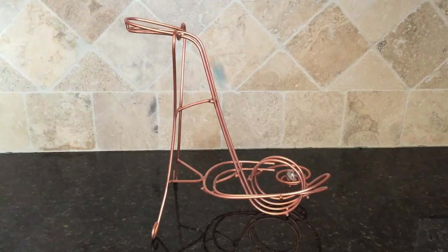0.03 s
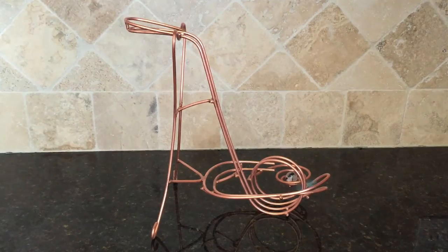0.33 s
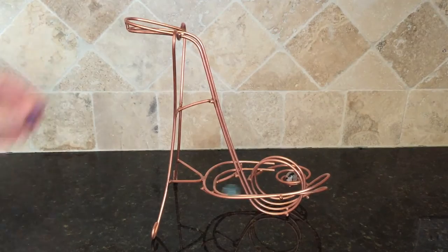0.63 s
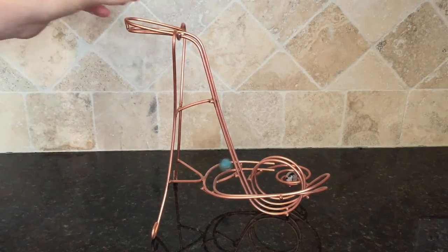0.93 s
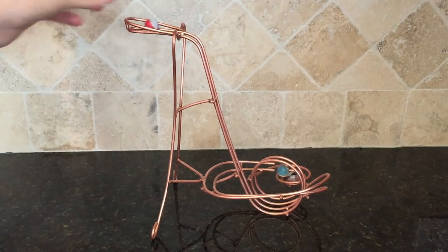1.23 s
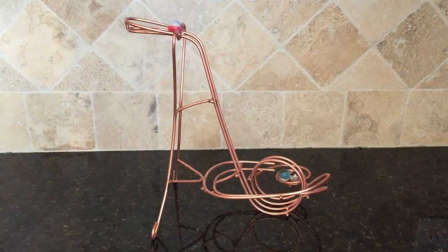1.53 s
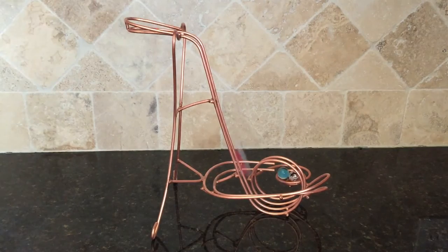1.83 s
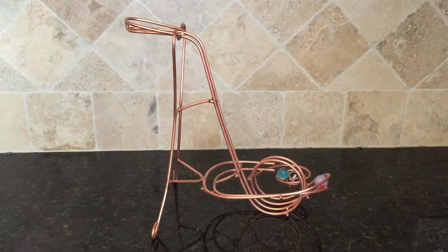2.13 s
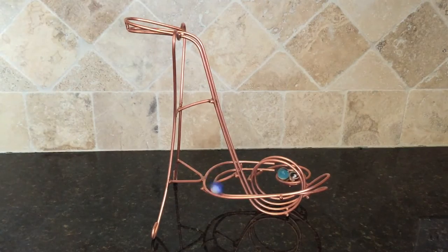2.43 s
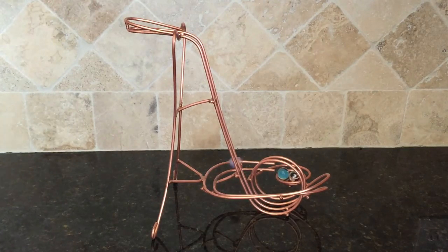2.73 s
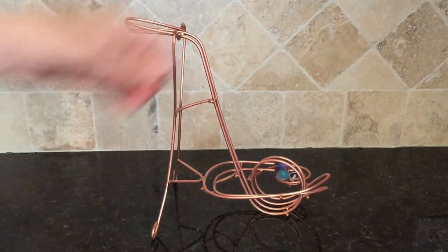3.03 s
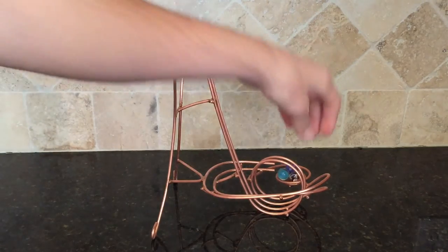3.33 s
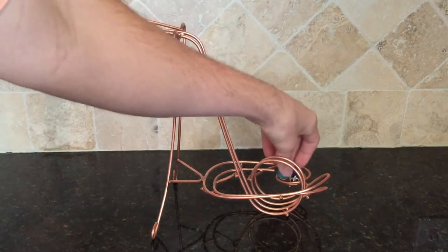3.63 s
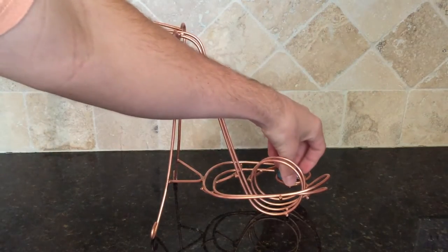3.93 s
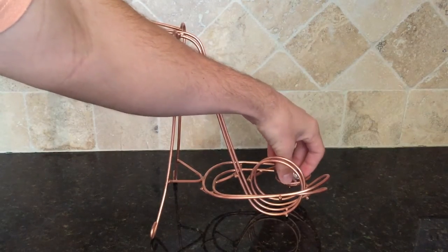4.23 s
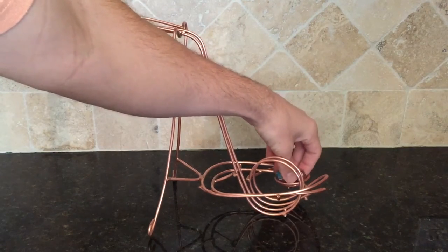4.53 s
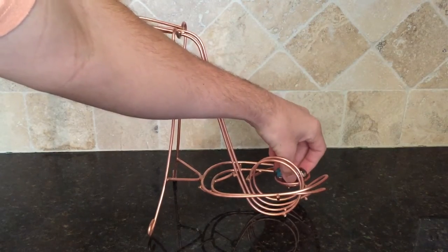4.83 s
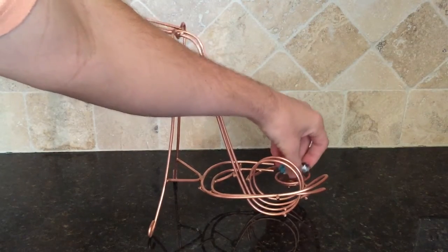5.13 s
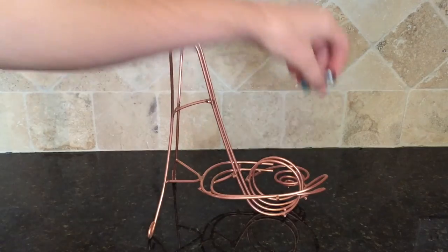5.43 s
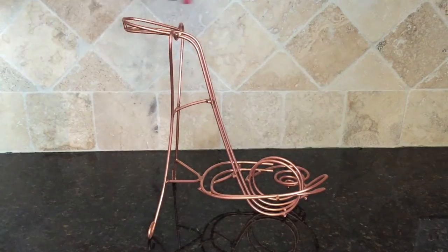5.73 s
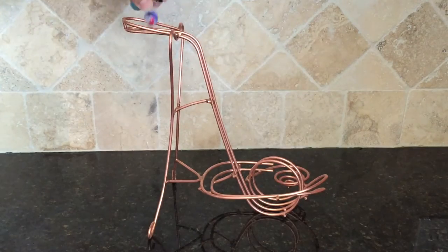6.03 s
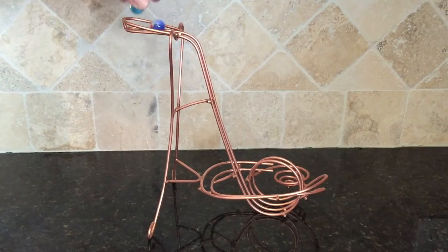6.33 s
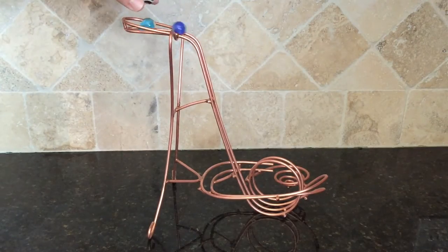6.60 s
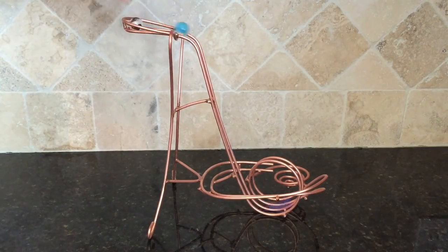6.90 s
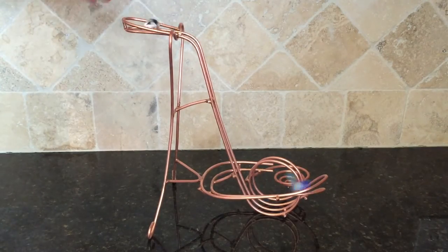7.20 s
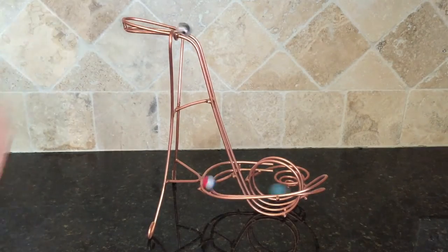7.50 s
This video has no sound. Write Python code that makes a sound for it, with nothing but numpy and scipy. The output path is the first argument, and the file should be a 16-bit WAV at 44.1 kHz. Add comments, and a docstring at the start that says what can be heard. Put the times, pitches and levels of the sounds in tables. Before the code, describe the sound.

Heard up close in a quiet kitchen, two glass marbles run one after the other down a wire track, each with bright clicks and a metallic rattle that surges and trails away. Glass clacks on glass, then it goes nearly silent apart from a few muted ticks. The wire frame knocks back onto the counter, several crisp ringing clicks follow, and two more marbles rattle down in quick succession over a faint hum.

```python
"""Glass marbles run down a copper wire track on a stone counter in a kitchen.
First two marbles, one after the other, knock onto the rails and rattle round the loop, exciting
the modes of the wire frame. From 3 s glass clacks on glass. A hand then holds the frame and damps
it, until at 5.2 s it drops back on its feet. More knocks follow, and near 7 s two more marbles run
down close together. A short room echo follows the marbles; air noise and a hum lie underneath."""
import sys
import numpy as np
from scipy import signal
from scipy.fft import rfft, irfft
from scipy.io import wavfile
from scipy.ndimage import uniform_filter1d

SR = 44100
rng = np.random.default_rng(int(sys.argv[2]) if len(sys.argv) > 2 else 0)


def put_to_file(sound):
    """Save the sound as 16-bit audio at rate SR, in the file named by the first command-line argument."""
    columns = np.atleast_2d(sound).T  # one column per channel
    safe = np.clip(columns, -1, 1)
    whole_steps = np.round(safe * 32767)
    wavfile.write(sys.argv[1], SR, whole_steps.astype(np.int16))


N = 337806
TIME = np.arange(N) / SR
SIZE = 2 ** 14  # samples in one short event
AGE = np.arange(SIZE) / SR
HZ = np.fft.rfftfreq(SIZE, 1 / SR) + 1
GRIP_START_S, GRIP_END_S, HELD_T60_S = 3.7, 5.2, 0.14  # fingers damp the wires


# glass striking wire: start_s, level_db, tilt_db_per_octave, relative_clang_db, ring_scale_s, pitch_hz
RAIL_KNOCKS = [(0.0, -48.5, -3.5, -8, 0.2, 13600), (0.0507, -46.5, -1, -12, 0.29, 5900),
               (0.153, -53.5, -8, -8.5, 0.16, 960), (0.181, -33, 6.5, -15.5, 0.12, 12100),
               (0.2339, -25.5, 4.5, -14.5, 0.12, 13400), (0.7104, -59, -4, -9, 0.083, 8470),
               (0.876, -49.5, -0.8, -25, 0.035, 9100), (1.1683, -25.5, 3.1, -12, 0.44, 2436),
               (1.211, -34, 1.3, -27, 0.2, 6840), (1.2978, -22.5, 6.5, -16.5, 0.36, 9550),
               (1.4906, -55.5, 0.5, -27, 0.078, 7200), (1.8966, -44, -1.5, -26, 0.15, 848),
               (1.9127, -40, 6, -11, 0.1, 882), (2.4783, -49, 0, -26, 0.88, 8900),
               (2.6132, -48, 1.5, -24, 0.051, 11600), (2.782, -59.5, -3, -9.5, 0.11, 800),
               (3.0293, -37, 2, -15.5, 0.37, 1283), (3.1194, -35, 0, -7, 0.56, 1294),
               (4.18, -51, 0.5, -15, 0.13, 9630), (4.205, -45, 1.7, -14.5, 0.029, 910),
               (5.2331, -36.5, 3, -7, 0.35, 8200), (5.271, -39.5, 11, -12, 0.25, 801),
               (6.1074, -33, 3, -16.5, 0.43, 1088), (6.127, -28.5, 12.5, -17, 0.095, 2503),
               (6.156, -26, 14, -14.5, 0.38, 8500), (6.4731, -25, 4, -13.5, 0.37, 6720),
               (6.8102, -40.5, 3.5, -10, 0.066, 11500), (6.8276, -23, 5, -15, 0.22, 13100),
               (6.906, -38, 4.5, -16, 0.6, 12200), (7.198, -35, 5.5, -10, 0.1, 7020),
               (7.241, -34, 1, -19, 0.068, 9130), (7.635, -49, -2, -16, 0.1, 8470)]
# share of a blow that swings the whole frame: frequency_hz, gain_db
CLANG_SPECTRUM = [(30, -32.5), (100, 12.5), (200, 6), (600, -5.5), (1000, 4), (1500, -4.5), (2500, 1.5),
                  (3500, -10), (7000, -8), (15000, -17.5)]

def knocks(modes, ring_share=0.45, clang_boost_db=1, free_t60_s=0.33):
    """Impact excitation: a blow disperses along the wires as a dense ring and sets low modes clanging."""
    out = np.zeros(N)
    for start_s, level_db, slope, clang_db, ring_scale_s, _ in RAIL_KNOCKS:
        frame = frame_response(modes)
        ring = colour(noise_burst(ring_scale_s * ring_share), frame * tilt(slope))
        ring = at_level(kitchen_echo(ring, wet_db=0), level_db, 0.024)
        t60_s = HELD_T60_S if GRIP_START_S < start_s < GRIP_END_S else free_t60_s
        clang = colour(noise_burst(t60_s), frame ** 1.07 * amp(curve(CLANG_SPECTRUM, HZ)))
        add(out, start_s, ring + at_level(clang, level_db + clang_db + clang_boost_db, 0.036))
    return out


def pings(gain_db=-8.5, rise_s=0.0029, t60_at_1khz_s=0.27, twin_db=-5):
    """Beating: a mode struck at its antinode sings on against the slightly detuned twin rail."""
    out = np.zeros(N)
    for start_s, level_db, _, _, _, pitch_hz in RAIL_KNOCKS:
        free_t60_s = t60_at_1khz_s * (pitch_hz / 1000) ** -0.13  # higher modes die sooner
        t60_s = HELD_T60_S if GRIP_START_S < start_s < GRIP_END_S else free_t60_s
        twin_hz = pitch_hz + rng.uniform(22.5, 90)
        rails = np.sin(2 * np.pi * pitch_hz * AGE) + amp(twin_db) * np.sin(2 * np.pi * twin_hz * AGE)
        envelope = amp(level_db + gain_db - 60 * AGE / t60_s) * (1 - np.exp(-AGE / rise_s))
        add(out, start_s, np.sqrt(2) * envelope * rails)
    return out


# trips down the track, timed from the foot of the loop:
# start_s, loop_force_db, leaving_force_db, growl_db, duration_s
MARBLE_RUNS = [(0.262, -34.5, -51, 3.5, 0.92), (1.976, -31.5, -48, 0.5, 1.27),
               (6.997, -34.5, -50.5, 5, 1.0), (7.256, -33, -45.5, 4.5, 1.0)]

def rolling(modes, gain_db=-3, growl_hz=1200, wander_octaves=0.3, hop=2048):
    """Moving excitation: chatter rings the frame from spot after spot, brighter under greater force."""
    force_db = rolling_force_db()
    run_s, _, _, run_growl_db, _ = np.transpose(MARBLE_RUNS)
    drive = np.pad(chatter(force_db), (hop, SIZE))
    window = np.pad(np.hanning(2 * hop), (0, SIZE - 2 * hop))
    out = np.zeros(N + hop)
    for i in range(0, N, hop):
        slope = 0.17 * (np.clip(force_db[i], -66, -30) + 38.5)
        centre_hz = growl_hz * 2 ** (wander_octaves * rng.standard_normal())
        growl_db = np.interp(i / SR, run_s, run_growl_db) * bell(centre_hz, octaves=0.78)
        frame = frame_response(modes, strong_spread_db=2.5, floor_db=0, ripple_db=3)
        gain = unit_rms(frame * tilt(slope) * amp(growl_db))
        add(out, i / SR, colour(drive[i:i + SIZE] * window, gain))
    return amp(gain_db) * kitchen_echo(out[hop:], wet_db=1)


def rolling_force_db():
    """Centripetal force: a marble presses hardest at the foot of the loop and goes light over the top."""
    ramp_lead_s, ramp_db = 0.7, -77.5
    bend_lead_s, bend_width_s, bend_db = 0.225, 0.025, -63
    turn_s, top_dip_db = 0.14, 5.5
    entry_s, entry_db_per_s, exit_db_per_s = 0.075, 177, 142.5
    slowing_db_per_s, creep_db = 27, -62  # on the wide curve, then round the last spiral
    power = np.zeros(N)
    for start_s, loop_db, leaving_db, _, duration_s in MARBLE_RUNS:
        age = TIME - start_s
        before, after = np.maximum(-age, 0), np.maximum(age - turn_s, 0)
        ramp = amp(ramp_db) * gate(age + ramp_lead_s, ramp_lead_s - bend_lead_s)
        bend = amp(bend_db) * np.exp(-.5 * ((age + bend_lead_s) / bend_width_s) ** 2)
        height = np.sin(np.pi * np.clip(age / turn_s, 0, 1)) ** 2
        easing_db = top_dip_db * height + entry_db_per_s * before + exit_db_per_s * after
        loop = amp(loop_db - easing_db) * gate(age + entry_s, duration_s)
        coast = np.hypot(amp(leaving_db - slowing_db_per_s * after), amp(creep_db))
        power += ramp ** 2 + bend ** 2 + loop ** 2 + (coast * gate(age, duration_s)) ** 2
    return 10 * np.log10(power + 1e-14)


def chatter(force_db, slow_per_s=250, fast_per_s=2000, spread_db=4, grind_db=-10, smear_t60_s=0.034):
    """Surface roughness: tiny impacts on flaws in the rails, denser at speed, over a fine grinding."""
    per_s = np.interp(force_db, [-58, -34], [slow_per_s, fast_per_s])
    sizes = amp(spread_db * np.minimum(rng.exponential(1, N), 4)) * rng.choice([-1, 1], N)
    taps = sizes * (rng.random(N) < per_s / SR) / np.sqrt(per_s)
    # bending waves disperse, so each impact arrives as a short burst
    power = signal.lfilter([1], [1, -amp(-120 / (smear_t60_s * SR))], taps ** 2)
    bursts = unit_rms(np.sqrt(power) * rng.standard_normal(N))
    return unit_rms(bursts + amp(grind_db) * rng.standard_normal(N)) * amp(force_db)


# marble striking marble: start_s, level_db, tilt_db_per_octave
GLASS_CLACKS = [(3.029, -30.5, 3.5), (3.157, -27, 4), (3.3585, -42.5, 0.4), (3.7232, -58.5, -5.5),
                (4.3378, -47.5, -6.5), (4.636, -58, -2.5), (6.1554, -27, 15)]

def clacks(modes, contact_t60_s=0.0014, ring_db=-7, ring_t60_s=0.078, low_cut_hz=1800):
    """Hard contact: glass on glass gives a brief tick and a little ring from the supporting wires."""
    out = np.zeros(N)
    envelope = amp(-60 * AGE / contact_t60_s) + amp(ring_db - 60 * AGE / ring_t60_s)
    for start_s, level_db, slope in GLASS_CLACKS:
        tick = rng.standard_normal(SIZE) * envelope
        gain = frame_response(modes) ** 0.97 * tilt(slope) / (1 + (low_cut_hz / HZ) ** 3)
        clack = kitchen_echo(colour(tick, gain), wet_db=-13)
        add(out, start_s, at_level(clack, level_db, 0.017))
    return out


# strong modes of the wire frame: frequency_hz, bandwidth_hz, peak_db
FRAME_MODES = [(316.3, 17, 16.5), (464.6, 24, 2), (704, 11, 8), (798, 17, 8), (927.3, 36, 10.5),
               (1136, 11, 9.5), (1277, 46, 8), (1801, 16, 9), (2494, 22, 18), (2590, 9.1, -0.5),
               (3230, 21, -3), (3962, 78, 9), (4405, 31, 7.5), (5930, 120, 8.5), (6930, 40.6, 6),
               (6826, 26, 16.5), (8280, 120, 10.5), (8480, 18.5, 5.5), (8760, 8.1, 21), (9133, 130, 13),
               (9574, 33, 16), (11105, 65, 15), (12000, 64, 17), (11950, 49, 21), (12430, 40, 18.5),
               (12970, 28, -6), (12830, 37, 18.5), (13200, 48, -8), (13700, 42, 1), (14230, 13.5, 5)]

def resonances(weak_count=260, weak_width_hz=22, weak_db=5.5):
    """Resonance: one power curve a row, for the strong modes and then many weak, irregular overtones."""
    weak_hz = np.linspace(1400, 16000, weak_count) + rng.uniform(-30, 30, weak_count)
    modes = list(FRAME_MODES) + [(hz, weak_width_hz, weak_db) for hz in weak_hz]
    centre_hz, width_hz, peak_db = np.transpose(modes)[:, :, None]
    return amp(peak_db) ** 2 / (1 + (2 * (HZ - centre_hz) / width_hz) ** 2)


# broad spectral envelope of the frame: frequency_hz, gain_db
FRAME_SPECTRUM = [(30, -33.5), (90, 5), (180, -17), (300, -8), (470, -2.5), (555, -7), (665, 0.5),
                  (1250, -1.5), (1500, -7), (2200, -6), (4300, 2.5), (5300, -0.5), (7400, 1), (9000, 0.5),
                  (10200, -0.5), (12500, -3.5), (15000, 1.5)]

def frame_response(modes, strong_spread_db=-0.5, weak_spread_db=3, floor_db=-4, ripple_db=0.5):
    """Modal superposition: a random contact point meets each mode nearer its node or its antinode."""
    spread_db = np.where(np.arange(len(modes)) < len(FRAME_MODES), strong_spread_db, weak_spread_db)
    weights = amp(spread_db * np.clip(rng.standard_normal(len(modes)), -2, 2)) ** 2
    # waves returning from the welds favour whole groups of modes
    groups = np.clip(rng.standard_normal(90), -2, 2)
    ripple = np.interp(np.sqrt(HZ), np.linspace(0, np.sqrt(HZ[-1]), len(groups)), groups)
    envelope = amp(curve(FRAME_SPECTRUM, HZ) + ripple_db * ripple)
    return np.sqrt(amp(floor_db) ** 2 + weights @ modes) * envelope


# soft blows on frame and counter: start_s, level_db, centre_hz, width_octaves, t60_s
DULL_BUMPS = [(1.298, -55.5, 462, 0.18, 0.39), (1.684, -56, 700, 0.46, 0.12),
              (1.689, -54.5, 288, 0.42, 0.28), (1.694, -53, 99, 0.41, 0.29), (3.36, -67.5, 930, 0.41, 0.2),
              (4.192, -56.5, 96, 0.25, 0.35), (4.338, -60, 860, 0.35, 0.24), (5.246, -51.5, 82, 0.29, 0.35)]

def bumps(thump_db=-18, thump_hz=106, thump_octaves=0.54, thump_t60_s=0.47):
    """Structure-borne sound: dull blows, and each knock thumping through the feet into the counter."""
    out = np.zeros(N)
    thumps = [(start_s, level_db + clang_db + thump_db, thump_hz, thump_octaves, thump_t60_s)
              for start_s, level_db, _, clang_db, _, _ in RAIL_KNOCKS]
    for start_s, level_db, centre_hz, octaves, t60_s in DULL_BUMPS + thumps:
        bump = colour(noise_burst(t60_s), bell(centre_hz, octaves) + 0.0041)
        add(out, start_s, at_level(bump, level_db, 0.0437))
    return out


def rocking(pitch_hz=335.3, half_width_hz=7, flutter_depth=0.76, flutter_hz=22):
    """Forced vibration: a low mode of the frame drones, fluttering as the marbles jostle."""
    hz = np.fft.rfftfreq(N, 1 / SR)
    mode = signal.hilbert(shaped_noise(1 / (1 + ((hz - pitch_hz) / half_width_hz) ** 2)))
    drone = mode.real / np.sqrt(abs(mode))  # evens out the random swells
    jostle = unit_rms(shaped_noise(1 / (1 + (hz / flutter_hz) ** 4)))
    return unit_rms(drone * (1 + flutter_depth * jostle)) * uniform_filter1d(rocking_level(), size=1500)


def rocking_level(sway_db=-69.5, growth_db_per_s=13, settle_db_per_s=33, kick_db=-12, kick_t60_s=0.73):
    """Energy summation: runs build up the frame's swing, knocks kick it, and the hand stops it."""
    power = np.zeros(N)
    for start_s, _, _, _, duration_s in MARBLE_RUNS:
        age = TIME - start_s
        growth_db = growth_db_per_s * np.clip(age, 0, duration_s)
        settling_db = settle_db_per_s * np.maximum(age - duration_s, 0)
        power += amp(sway_db + growth_db - settling_db) ** 2 * (age > 0)
    for start_s, level_db, _, clang_db, _, _ in RAIL_KNOCKS:
        add(power, start_s, amp(level_db + clang_db + kick_db - 60 * TIME[:SR] / kick_t60_s) ** 2)
    held = gate(TIME - GRIP_START_S, GRIP_END_S - GRIP_START_S)
    return np.sqrt(power) * (1 - held)


# reverberation time of the kitchen: frequency_hz, t60_s
KITCHEN_DECAY = [(100, 0.086), (350, 0.35), (900, 0.4), (2000, 0.24), (5000, 0.14), (12000, 0.1),
                 (16000, 0.086)]

def kitchen_echo(direct, wet_db, onset_s=0.0021):
    """Reverberation: dense reflections from tiles and counter follow the direct sound."""
    hz, age, spectra = signal.stft(rng.standard_normal(SIZE), SR, nperseg=256)
    decay = amp(-60 * age / curve(KITCHEN_DECAY, hz)[:, None])
    tail = signal.istft(spectra * decay, SR, nperseg=256)[1][:SIZE]
    tail *= 1 - np.exp(-(AGE / onset_s) ** 2)
    return direct + amp(wet_db) * signal.fftconvolve(direct, tail / np.linalg.norm(tail))[:len(direct)]


# spectrum of the room's air noise: frequency_hz, relative_db
AIR_SPECTRUM = [(15, -71.5), (25, -33.5), (43, -11), (97, -3.5), (145, -13.5), (166, -12), (263, -8),
                (394, -11), (531, -24.5), (591, -19.5), (887, -23.5), (1160, -22), (1440, -24),
                (14800, -38.5), (16000, -64)]
# partials of an appliance's hum: pitch_hz, level_db
APPLIANCE_HUM = [(60, -73), (99, -69.5), (120, -75)]

def room_noise(air_db=-64.1):
    """Noise floor: steady broadband air noise with the line spectrum of a faint hum."""
    air = shaped_noise(amp(curve(AIR_SPECTRUM, np.fft.rfftfreq(N, 1 / SR))))
    hum = sum(np.sqrt(2) * amp(level_db) * np.sin(2 * np.pi * (pitch_hz * TIME + rng.random()))
              for pitch_hz, level_db in APPLIANCE_HUM)
    return amp(air_db) * unit_rms(air) + hum


def amp(db):
    """Decibels to amplitude ratio."""
    return 10 ** (np.asarray(db) / 20)


def unit_rms(x):
    """Normalisation to rms 1."""
    return x / np.sqrt(np.mean(x ** 2) + 1e-20)


def at_level(x, level_db, first_s):
    """Normalisation by the rms level of a sound's first moments."""
    return x * amp(level_db) / np.sqrt(np.mean(x[:int(first_s * SR)] ** 2) + 1e-20)


def curve(points, hz):
    """Interpolation of a table over log frequency."""
    points_hz, values = np.transpose(points)
    return np.interp(np.log(hz + 1), np.log(points_hz), values)


def bell(centre_hz, octaves):
    """Gaussian band over log frequency."""
    return np.exp(-.5 * (np.log2(HZ / centre_hz) / octaves) ** 2)


def tilt(db_per_octave):
    """Spectral slope: harder, shorter contacts carry more treble."""
    return amp(db_per_octave * np.log2(np.maximum(HZ, 1500) / 6500))


def colour(x, gain):
    """Minimum-phase filter with the given gain at each of HZ."""
    log_gain = np.log(np.maximum(gain, gain.max() * 1e-5))
    mirrored = np.r_[log_gain, log_gain[-2:0:-1]]
    taps = np.fft.ifft(np.exp(signal.hilbert(mirrored).conj())).real
    return signal.fftconvolve(x, taps[:SIZE // 2])[:len(x)]


def noise_burst(t60_s):
    """Exponential decay of white noise."""
    return rng.standard_normal(SIZE) * amp(-60 * AGE / t60_s)


def shaped_noise(gain):
    """Stationary noise with the given amplitude spectrum."""
    return irfft(rfft(rng.standard_normal(N)) * gain, N)


def gate(age, duration_s):
    """Rectangular window with softened edges."""
    return uniform_filter1d(1. * ((age > 0) & (age < duration_s)), size=1500)


def add(mix, start_s, sound):
    """Superposition of a sound on the mix from start_s."""
    part = mix[max(0, round(start_s * SR)):][:len(sound)]
    part += sound[:len(part)]


def scene():
    """Superposition of all sources in one channel."""
    modes = resonances()
    marbles = knocks(modes) + pings() + rolling(modes) + clacks(modes)
    return (marbles + bumps() + rocking() + room_noise())[None]


def record(dry, cutoff_hz=15330):
    """Band limiting: a steep low-pass removes the highest treble."""
    low_pass = signal.firwin(401, cutoff_hz, window=("kaiser", 8), fs=SR)
    return signal.oaconvolve(dry, low_pass[None], "same")


dry = scene()
out = record(dry)
put_to_file(out)
```